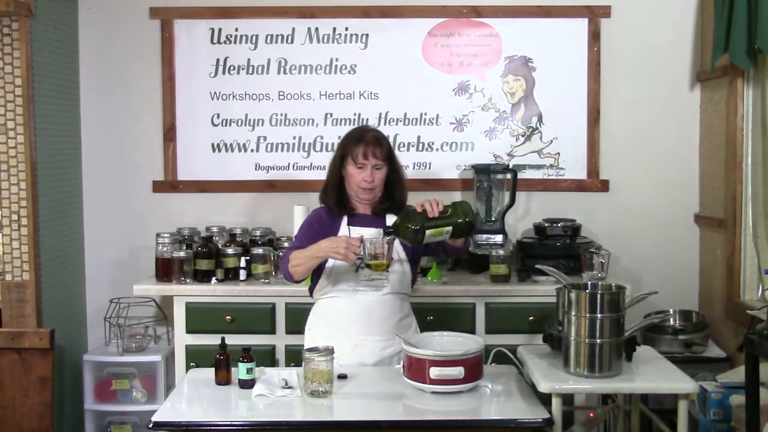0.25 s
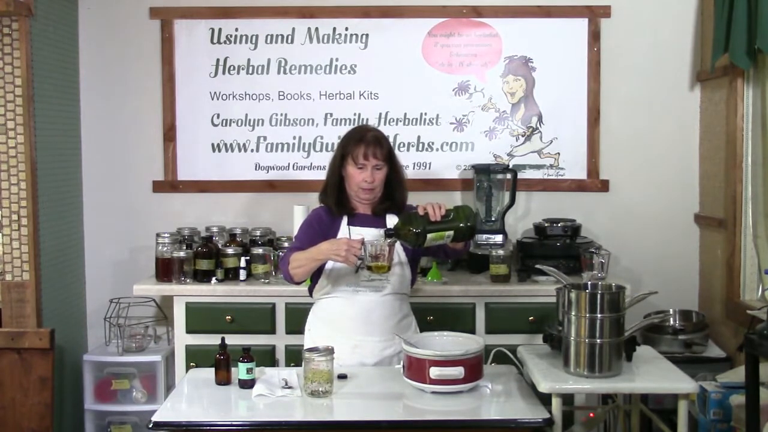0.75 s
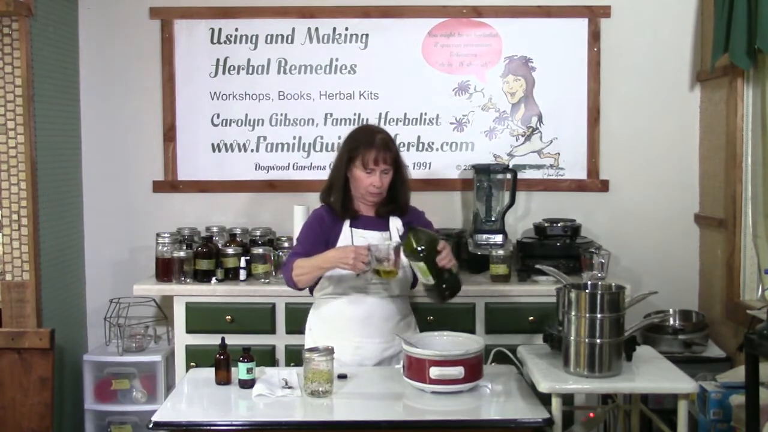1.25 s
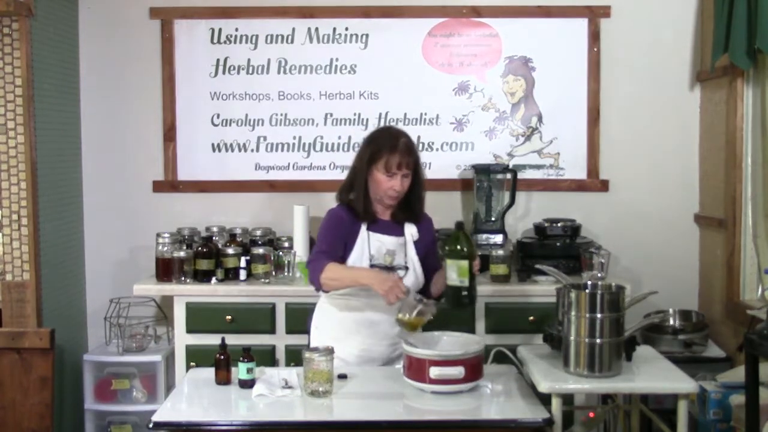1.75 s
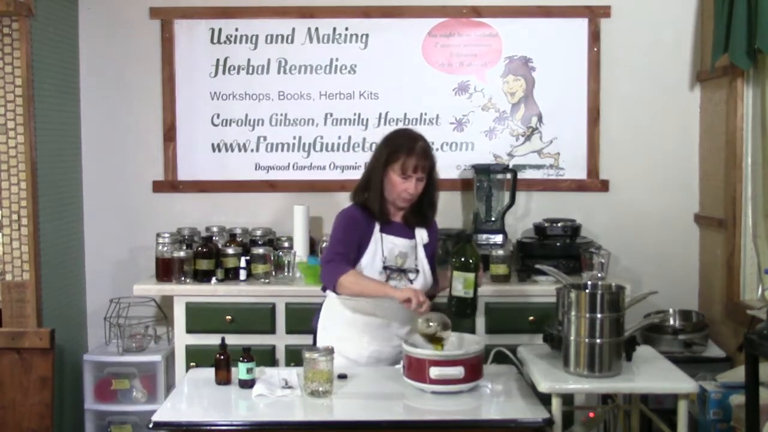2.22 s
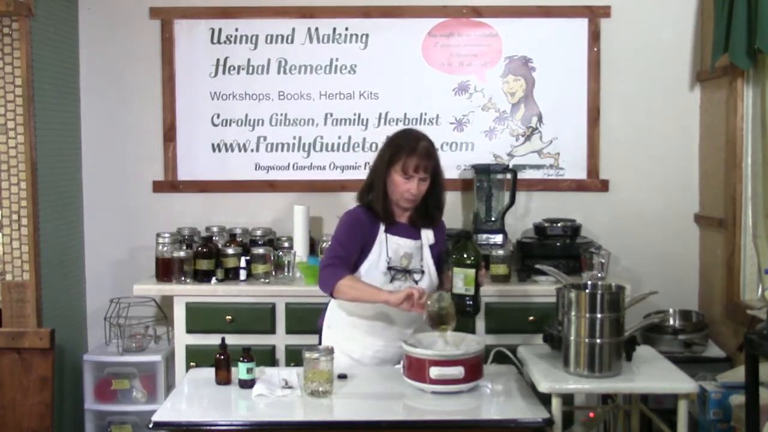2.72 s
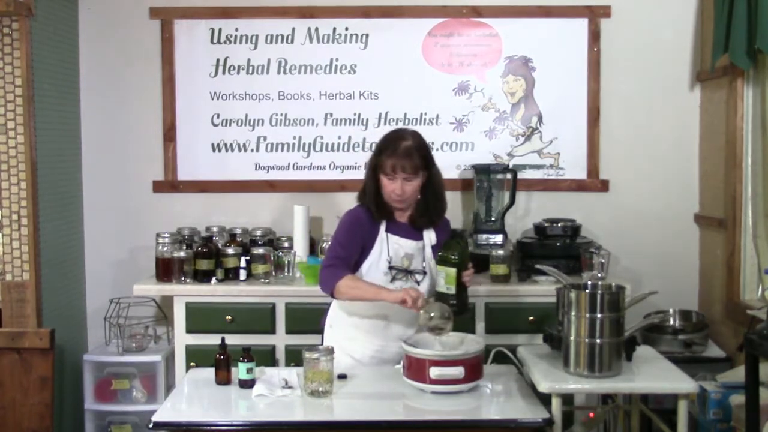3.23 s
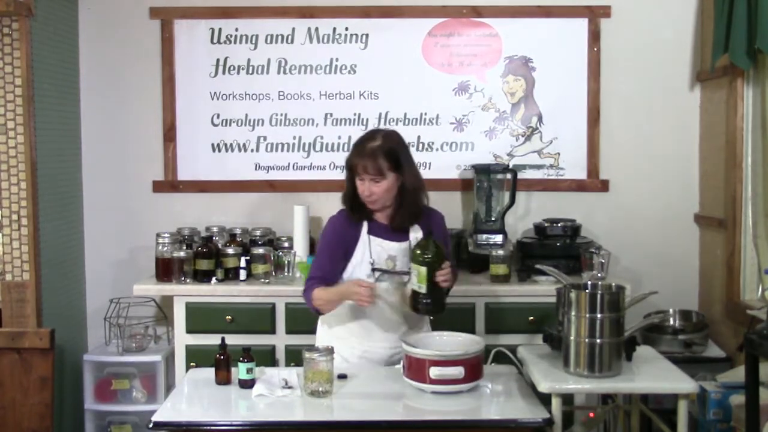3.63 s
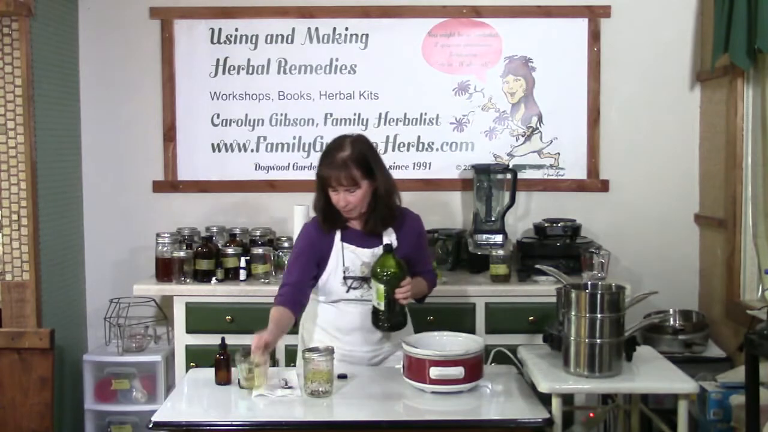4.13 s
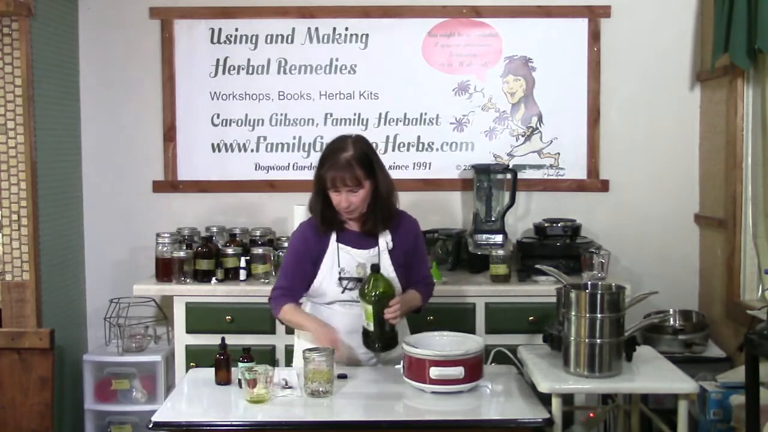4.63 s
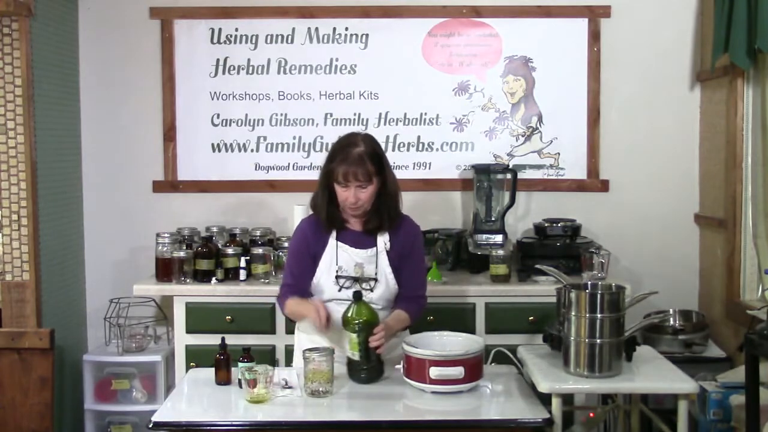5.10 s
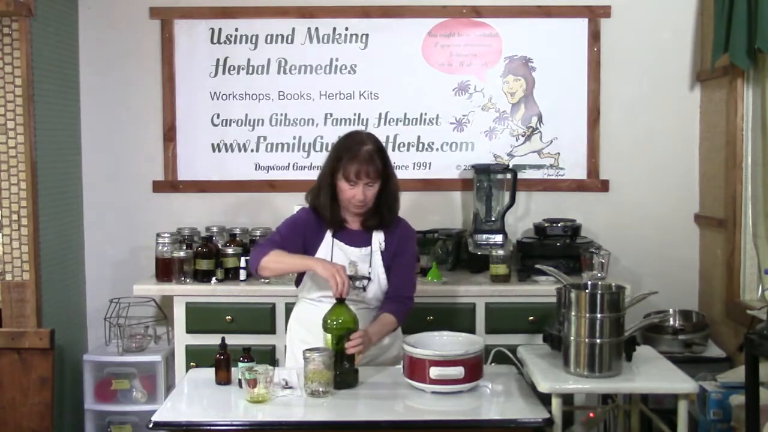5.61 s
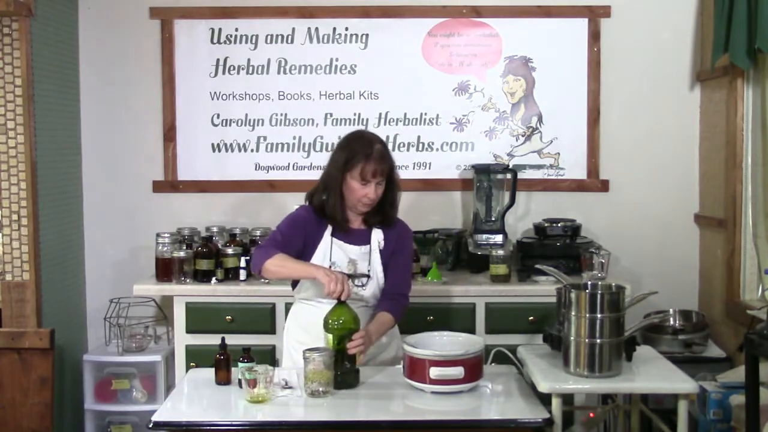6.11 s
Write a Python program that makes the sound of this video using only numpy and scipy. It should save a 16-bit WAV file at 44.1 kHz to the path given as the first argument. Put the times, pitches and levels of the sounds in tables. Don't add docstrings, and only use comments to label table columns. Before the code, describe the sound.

Oil glugs softly from a bottle, glass squeaks briefly on a pot rim, then a cup lands with loud knocks and a rattling table.

```python
import sys
import numpy as np
from scipy import signal
from scipy.fft import rfft, irfft, next_fast_len
from scipy.io import wavfile
from scipy.ndimage import map_coordinates

SR = 44100
rng = np.random.default_rng(int(sys.argv[2]) if len(sys.argv) > 2 else 0)


def int16_out(signal):
    q = np.round(np.clip(np.atleast_2d(signal).T, -1, 1) * 32767)
    wavfile.write(sys.argv[1], SR, q.astype(np.int16))


def gain_from_db(level_db):
    decades = np.asarray(level_db, float) / 20
    return 10 ** decades


N = 280602


def unit(x):
    return x / np.sqrt(np.mean(x ** 2) + 1e-20)


def along(points, hz):
    f, v = np.transpose(points)
    return np.interp(np.log(hz + 1), np.log(f + 1), v)


def wobble(rate):
    knots = rng.standard_normal(int(N * rate / SR) + 4)
    return map_coordinates(knots, [np.arange(N) * rate / SR])


def filtered(x, response):
    m = next_fast_len(len(x) + 8192)
    spectrum = rfft(x, m) * response(np.fft.rfftfreq(m, 1 / SR))
    return irfft(spectrum, m)[:len(x)]


def modes(rows):
    def response(f):
        total = 0
        for k, (centre, width, db) in enumerate(rows):
            damping = 1j * f * width
            total = total + (-1) ** k * gain_from_db(db) * damping / (centre * centre - f * f + damping)
        return total
    return response


def noise(spectrum, size=N):
    white = rng.standard_normal(size)
    return unit(filtered(white, lambda hz: gain_from_db(along(spectrum, hz))))


def add(track, s, sound):
    part = track[round(s * SR):][:len(sound)]
    part += sound[:len(part)]


# (delay [s], level [dB])
WALL_ECHOES = [(.010, -0.5), (.017, -14.5), (0.022, -5.5), (.034, -19.5), (.05, -9.5)]
# (frequency [Hz], time to fall 60 dB [s])
ROOM_DECAY = [(100, 0.55), (300, 0.48), (1000, 0.44), (4000, 0.33), (12000, 0.15)]


def in_room(x, wet_db):
    hz, t, z = signal.stft(rng.standard_normal(SR // 2), SR, nperseg=256)
    fading = gain_from_db(-60 * t / along(ROOM_DECAY, hz)[:, None])
    tail = signal.istft(z * fading, SR, nperseg=256)[1]
    tail *= 1 - np.exp(-np.arange(len(tail)) / SR / 0.0017)
    answer = gain_from_db(wet_db) * tail / np.linalg.norm(tail)
    answer[0] += 1
    for s, db in WALL_ECHOES:
        answer[round(s * SR)] += gain_from_db(db)
    return signal.fftconvolve(x, answer)


def swells(rows, peak=0.42):
    t = np.arange(N) / SR
    gain = 0
    for s, length, db in rows:
        rise_and_fall = np.interp(t, [s, s + peak * length, s + length], [0, 1, 0])
        gain = gain + gain_from_db(db) * np.sin(np.pi / 2 * rise_and_fall) ** 2
    return gain


def rubbing(strokes, spectrum, uneven_db, rate, peak=0.42):
    rub = swells(strokes, peak) * noise(spectrum) * gain_from_db(uneven_db * wobble(rate))
    return in_room(gain_from_db(-6.5) * rub, wet_db=6.0)[:N]


# (frequency [Hz], level per Hz [dB])
HISS_COLOUR = [(20, -18), (70, -12), (300, 1.5), (976, -3.5), (2100, -9.5), (4810, -16.5), (10800, -26),
               (16000, -39)]


def hiss():
    return gain_from_db(-58 + 0.72 * wobble(15.0)) * noise(HISS_COLOUR)


DRIVE_HZ = 15 / 1.001
# (frequency [Hz], width [Hz], level [dB])
CAMERA_SHELL = [(1450, 360, 2.5), (1940, 730, 0.5), (2410, 330, 2.5)]


def drive():
    since_stroke = (np.arange(N) / SR - .055) % (1 / DRIVE_HZ)
    stroke = (since_stroke < .017) * gain_from_db(1.1 * wobble(DRIVE_HZ) + 2.5 * wobble(250))
    chatter = unit(filtered(rng.standard_normal(N), modes(CAMERA_SHELL)))
    return gain_from_db(-62.0) * chatter * stroke


# (first step [s], number of steps, level [dB])
MOTOR_RUNS = [(.06, 4, -76.5), (.66, 2, -82), (.93, 2, -75), (1.72, 3, -82), (2.33, 3, -86), (3.0, 3, -83),
              (3.46, 2, -83), (3.86, 2, -76), (4.595, 3, -77), (5.19, 3, -78)]


def lens_motor():
    t = np.arange(N) / SR
    steps = 0
    for first, count, db in MOTOR_RUNS:
        for k in range(round(count)):
            s = first + 2 * k / DRIVE_HZ
            ramps = np.minimum(t - s, s + 0.078 - t) / 0.0056
            steps = steps + gain_from_db(db) * np.clip(ramps, 0, 1)
    tone = np.sin(2 * np.pi * 5565 * t + 0.33 * wobble(60))
    return steps * gain_from_db(6 + 2.8 * wobble(120)) * tone


# (time [s], peak level [dB], pitch [Hz])
BUBBLES = [(0.01, -47.5, 1022), (0.035, -41.5, 1427), (0.258, -36.5, 1170), (0.262, -42, 942),
           (0.452, -38, 899), (0.664, -31.5, 906), (0.705, -41, 841), (0.74, -49, 807), (0.74, -42.5, 610),
           (0.873, -29, 938), (1.191, -55, 1450), (1.336, -47.5, 900), (1.36, -50, 750),
           (1.362, -46.5, 2026), (1.395, -52, 1290), (1.424, -44, 1360), (1.706, -47, 854),
           (1.735, -47, 810), (2.31, -45.5, 376), (2.71, -49, 940), (2.724, -45, 610)]


def oil():
    out, t = np.zeros(N), np.arange(SR // 5) / SR
    for s, db, hz in BUBBLES:
        gurgle = 1 + .25 * map_coordinates(rng.standard_normal(64), [t * 250])
        rising = np.sin(2 * np.pi * hz * (t + 1.04 * t * t))
        fade = gain_from_db(-60 * t / .048)
        soft_start = 1 - np.exp(-t / 0.0032)
        bubble = gain_from_db(db + 5.5) * gurgle * rising * fade * soft_start
        add(out, s, in_room(bubble, wet_db=-6.0))
    return out


# (time [s], peak level [dB], pitch [Hz])
CONTACTS = [(0.0368, -45, 9050), (0.258, -44, 4540), (1.151, -46, 3720), (1.1776, -43, 3950),
            (1.3396, -28.5, 4650), (1.358, -44, 2700), (1.496, -48, 5700), (2.3738, -37, 5050),
            (3.197, -47.5, 4620), (5.289, -37, 11300), (5.5443, -33, 11000), (5.544, -45, 3470),
            (5.802, -44, 3200), (4.2769, -10.5, 9200), (4.42, -30, 9000), (4.481, -34, 9000)]


def ticks():
    out, t = np.zeros(N), np.arange(SR // 20) / SR
    for s, db, hz in CONTACTS:
        burst = rng.standard_normal(len(t)) * np.exp(-t / 0.0058)
        click = filtered(burst, modes([(hz, 2300, 0)]))
        add(out, s, in_room(gain_from_db(db - 8.5) * click / abs(click).max(), wet_db=-2.5))
    return out


# (start [s], length [s], level [dB])
SLEEVE_STROKES = [(1.17, 0.028, -52.5), (1.325, 0.039, -52.5), (1.69, 0.067, -57.5), (2.3, 0.15, -59),
                  (2.69, 0.057, -56.5), (3.56, 0.19, -54), (3.66, 0.19, -61)]
# (frequency [Hz], level per Hz [dB])
CLOTH_COLOUR = [(88, -43), (150, 7), (336, -6), (382, -18), (419, -7), (938, -1.5), (12000, -26.5),
                (15600, -61), (22000, -120)]


def sleeve():
    return rubbing(SLEEVE_STROKES, CLOTH_COLOUR, uneven_db=1.6, rate=50)


# (start [s], length [s], level [dB])
RIM_PUSHES = [
    (2.27, 0.082, -45.5),
    (2.33, 0.088, -44.5),
    (2.375, 0.086, -47.5),
]
# (frequency [Hz], width [Hz], level [dB])
CUP_RING = [(2410, 64, 5), (4500, 120, -14.5), (5220, 110, -13.5), (6520, 180, -23), (7560, 280, -22),
            (11000, 200, -27), (12100, 160, -24)]


def squeak():
    since_start = np.arange(N) / SR - RIM_PUSHES[0][0]
    hz = 2495 - 270 * since_start
    turn = 2 * np.pi * np.cumsum(hz * (1 + 0.0127 * wobble(80))) / SR
    overtone = np.sin(turn) * gain_from_db(2.5 * wobble(90))
    slow_slips = gain_from_db(-11 + 2.2 * wobble(50)) * np.sin(turn / 3)
    ring = filtered(rng.standard_normal(N), modes(CUP_RING)) * gain_from_db(9.0)
    rubbed = swells(RIM_PUSHES) * gain_from_db(-2.5) * (overtone + slow_slips + ring)
    return in_room(rubbed, wet_db=0.0)[:N]


def rattle(rows, fade, soft_hz):
    shaken = 0
    for mode in rows:
        chatter = rng.standard_normal(len(fade)) * fade
        shaken = shaken + filtered(chatter, modes([mode]))
    shaken = filtered(shaken, lambda f: 1 / (1 + 1j * f / soft_hz) ** 2)
    return shaken / abs(shaken).max()


# (frequency [Hz], width [Hz], level [dB])
PANEL = [(410, 180, 1), (546, 179, 2), (786, 266, 0.5), (1170, 530, -6), (1580, 450, -4.5),
         (2010, 420, -7.5), (2690, 460, -6.5), (3320, 410, -11.5), (4150, 1300, -21)]
# (frequency [Hz], width [Hz], level [dB])
THUD_MODES = [(147, 87, -7.5), (273, 111, 0)]
# (frequency [Hz], level per Hz [dB])
CRACK_COLOUR = [(1470, -36), (2500, -11), (3520, -1.5), (4550, -6.5), (8020, -10.5), (11500, -12),
                (16000, -40)]


def table(blows, contact_s, rise_s, soft_hz):
    out, t = np.zeros(N), np.arange(SR // 8) / SR
    fade = np.exp(-t / contact_s) * (1 - np.exp(-t / rise_s))
    for s, db, thud_db, crack_db in blows:
        crack = gain_from_db(crack_db + 0.5) * noise(CRACK_COLOUR, size=len(t)) * fade ** 2.08
        panel = rattle(PANEL, fade, soft_hz)
        thud = gain_from_db(thud_db) * rattle(THUD_MODES, fade, soft_hz)
        add(out, s, in_room(gain_from_db(db - 2) * (panel + thud + crack), wet_db=4.0))
    return out


# (time [s], peak level [dB], thud level [dB], crack level [dB])
CUP_HITS = [
    (4.276, -5.5, -11, -8),
    (4.287, -7.5, -4, -14.5),
    (4.339, -10, -9, -12),
    (4.374, -25.5, -10, -8),
    (4.42, -9.5, -13, -16.5),
    (4.439, -17, -15, -28),
    (4.479, -17, -8, -9),
    (4.499, -19, -10, -29),
    (4.536, -22.5, -2.5, -23),
]


def cup_landing():
    return table(CUP_HITS, contact_s=0.0071, rise_s=0.00016, soft_hz=19000)


# (time [s], peak level [dB], thud level [dB], crack level [dB])
BOTTLE_HITS = [(4.849, -35.5, 6, -19), (4.864, -33, -1, -12), (4.929, -41, 4, -13), (5.092, -40, 8, -28),
               (5.103, -31, 4, -23), (5.148, -34.5, -2, -12), (5.543, -32.5, -10, -10.5),
               (5.585, -45, 2, -33), (5.701, -38.5, 0, -39), (5.8, -26.5, -6.5, -37), (5.94, -53, 7, -31),
               (6.05, -47, 7, -7)]


def bottle_set_down():
    return table(BOTTLE_HITS, contact_s=0.0089, rise_s=.0007, soft_hz=4900)


# (start [s], length [s], level [dB])
BOTTLE_DRAGS = [(5.14, 0.15, -50.5), (5.22, 0.17, -48.5), (5.3, .18, -46.5), (5.44, .12, -49.5),
                (5.72, 0.076, -53.5), (5.84, 0.22, -55.5)]
# (frequency [Hz], level per Hz [dB])
SLIDE_COLOUR = [(59, -64.5), (100, -9.5), (318, 1), (427, -7), (937, -5), (1420, -10.5), (4000, -24),
                (8800, -32.5)]


def bottle_drag():
    return rubbing(BOTTLE_DRAGS, SLIDE_COLOUR, uneven_db=2.2, rate=45)


# (start [s], length [s], level [dB])
FINGER_SCUFFS = [(5.22, 0.18, -60.5), (5.3, 0.23, -64.5)]
# (frequency [Hz], level per Hz [dB])
SCUFF_COLOUR = [(2060, -39.5), (3500, -5), (5030, -3), (10700, -3), (15000, -19), (16000, -34)]


def fingers():
    return rubbing(FINGER_SCUFFS, SCUFF_COLOUR, uneven_db=3.1, rate=54)


# (start [s], length [s], level [dB])
CAP_TWISTS = [(6.04, 0.15, -50.5), (6.13, 0.23, -47)]
# (frequency [Hz], level per Hz [dB])
THREAD_COLOUR = [(710, -11), (1200, -14), (2530, -11), (3150, -8.5), (3660, -11.5), (5590, -12),
                 (9210, -19), (16000, -38)]


def cap():
    return rubbing(CAP_TWISTS, THREAD_COLOUR, uneven_db=1.2, rate=80, peak=0.44)


def microphone(x):
    return filtered(x, lambda f: (1j * f / (113 + 1j * f)) ** 4 / (1 + 1j * f / 12900))


def scene():
    rubs = sleeve() + bottle_drag() + fingers() + cap()
    kitchen = oil() + ticks() + squeak() + cup_landing() + bottle_set_down() + rubs
    camera = hiss() + drive() + lens_motor()
    return (microphone(kitchen) + camera)[None]


def roll_off(x):
    return signal.sosfilt(signal.butter(12, 15800, fs=SR, output="sos"), x)


def record(dry):
    return roll_off(dry)


dry = scene()
out = record(dry)
int16_out(out)
```